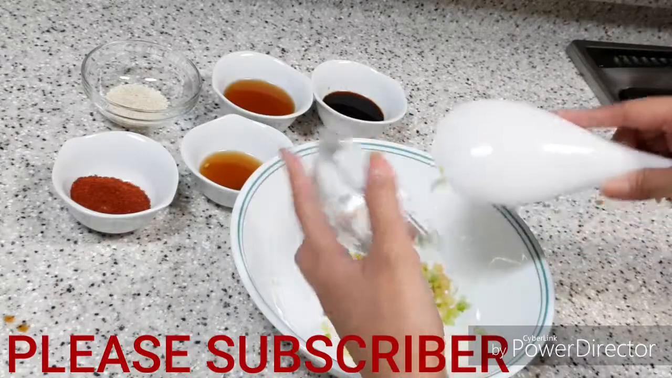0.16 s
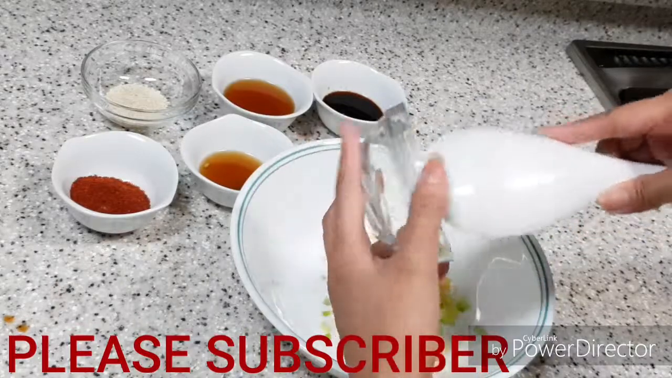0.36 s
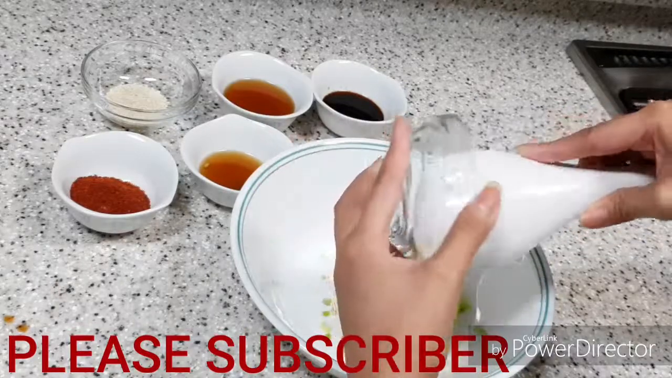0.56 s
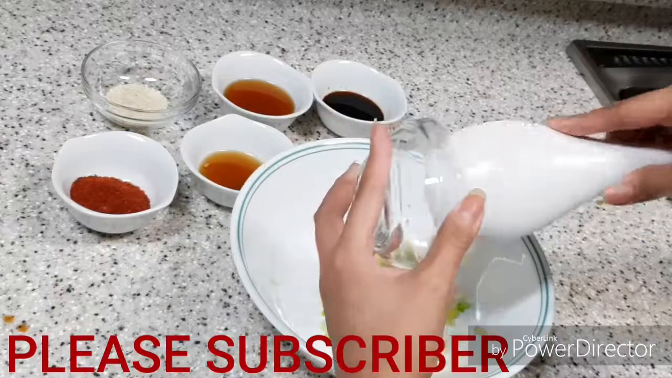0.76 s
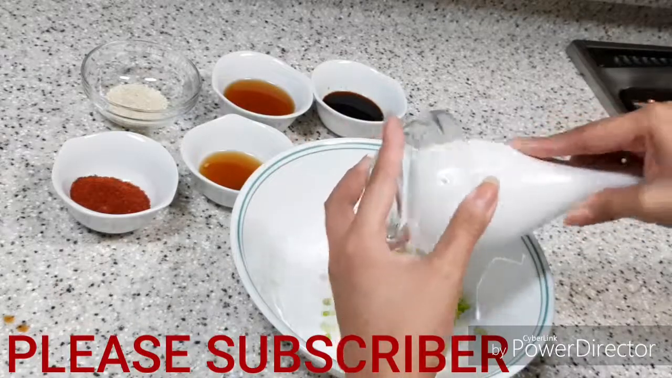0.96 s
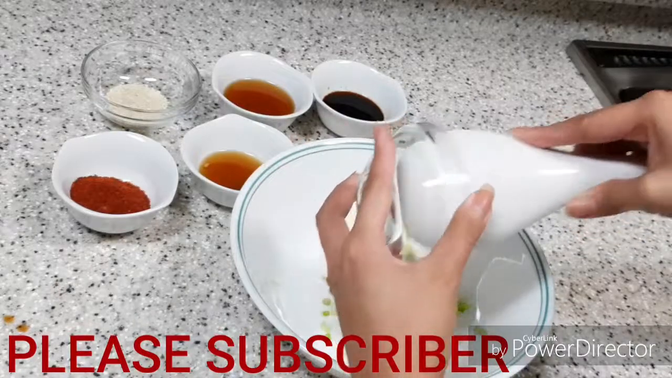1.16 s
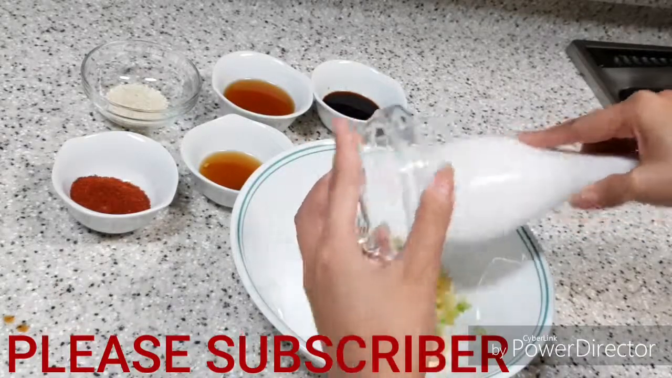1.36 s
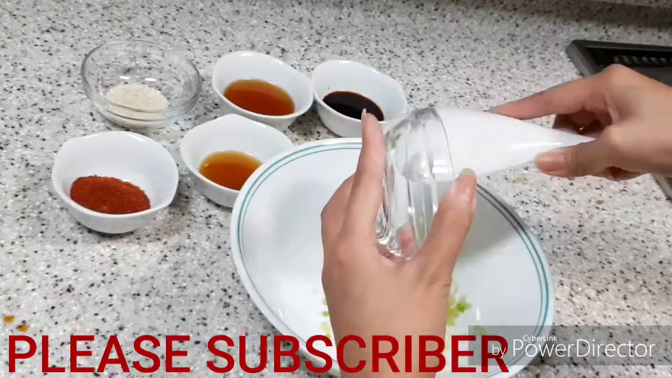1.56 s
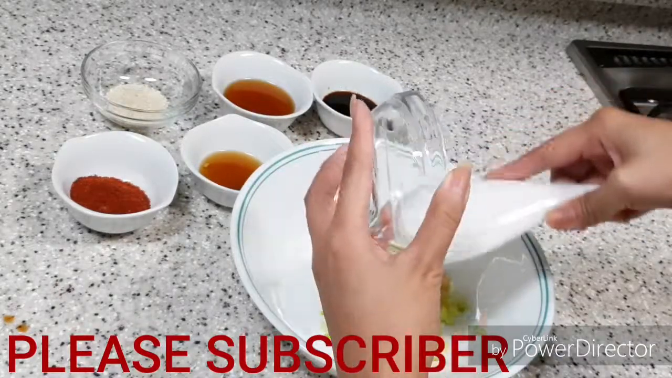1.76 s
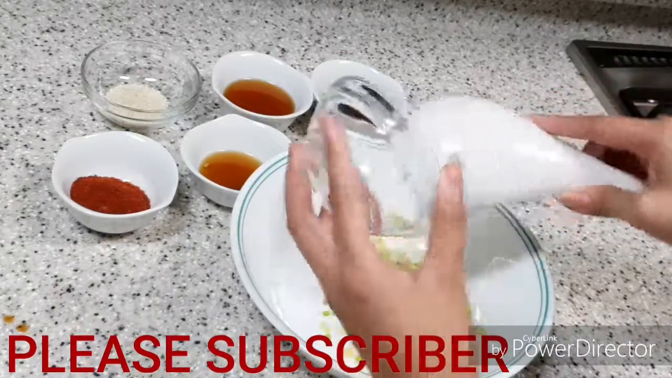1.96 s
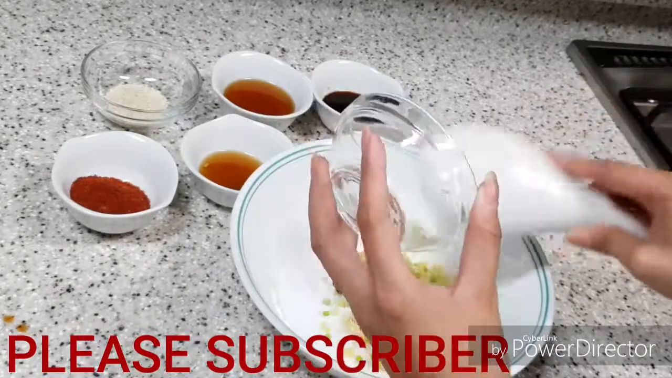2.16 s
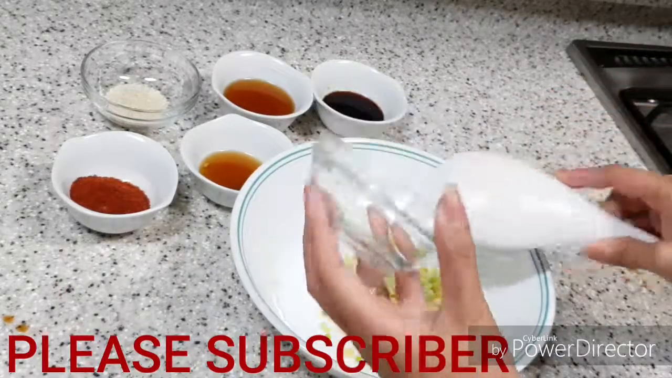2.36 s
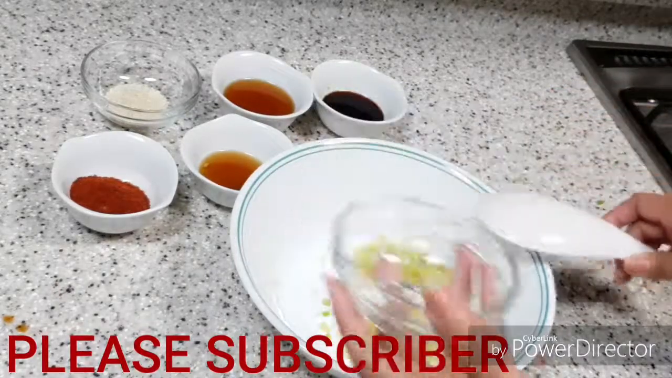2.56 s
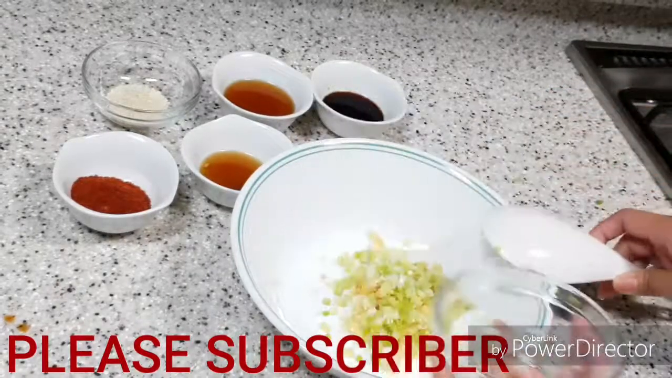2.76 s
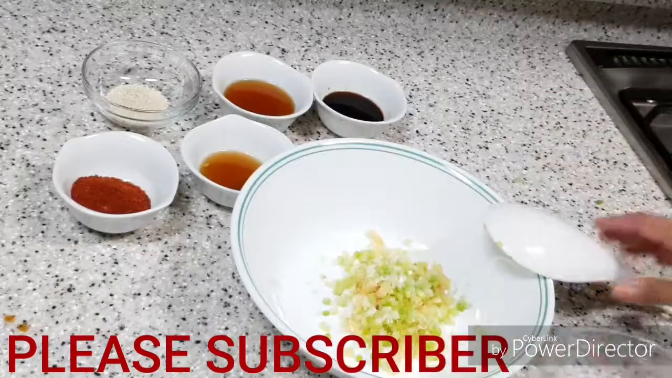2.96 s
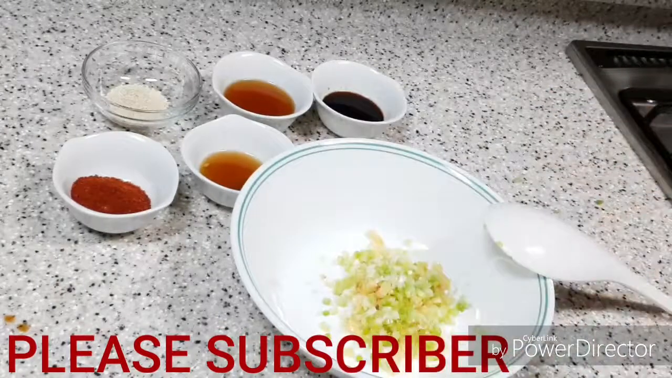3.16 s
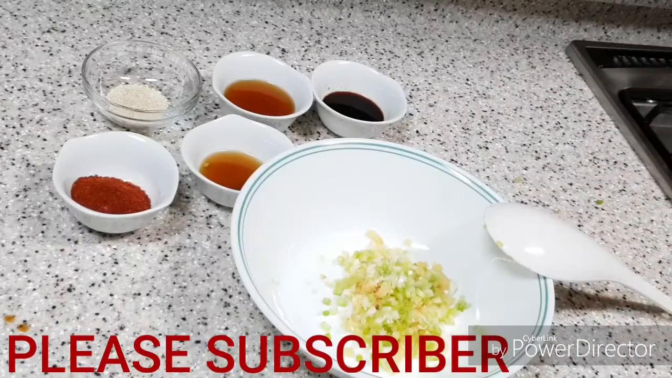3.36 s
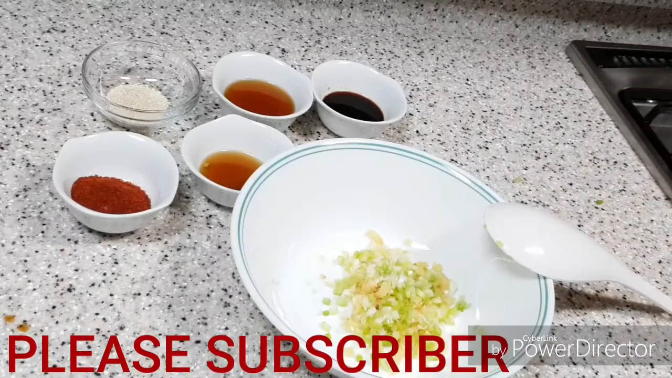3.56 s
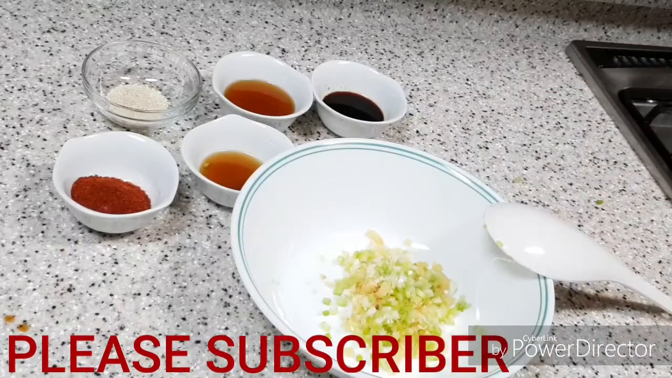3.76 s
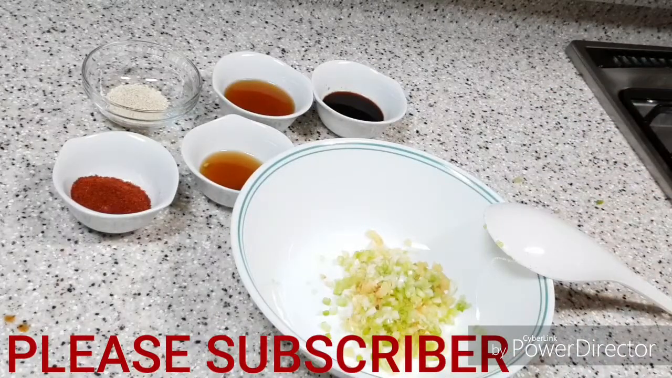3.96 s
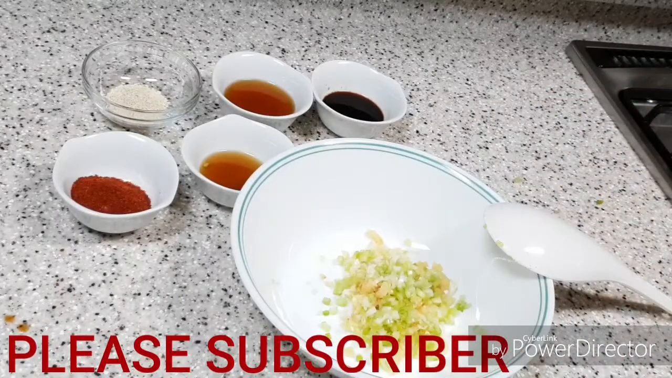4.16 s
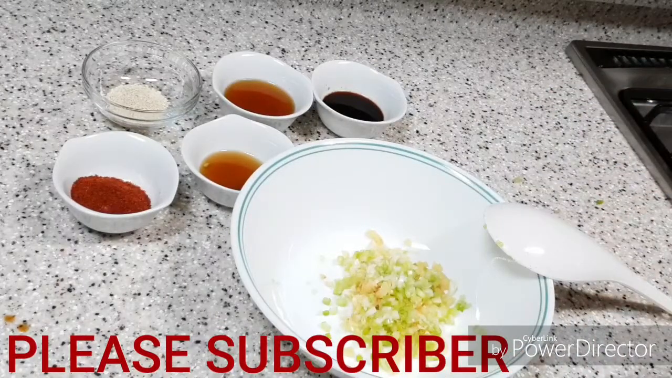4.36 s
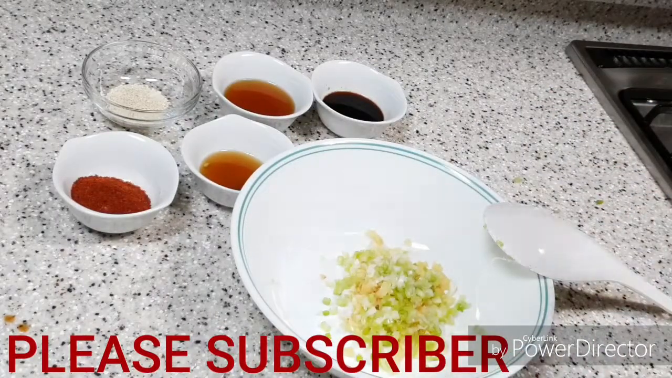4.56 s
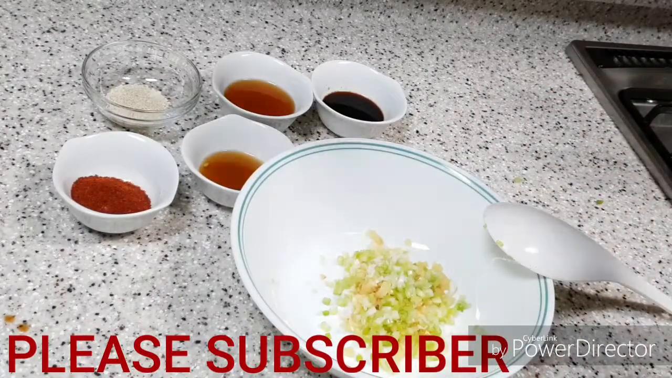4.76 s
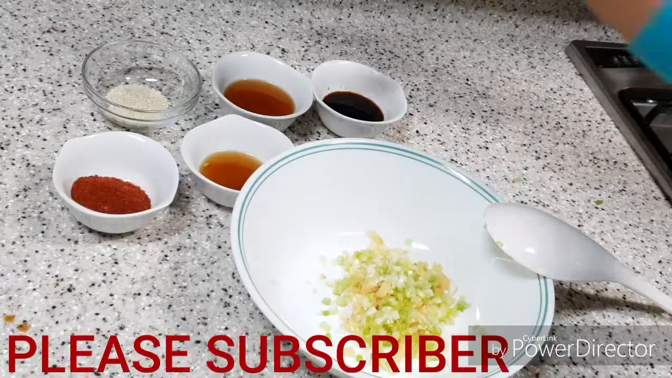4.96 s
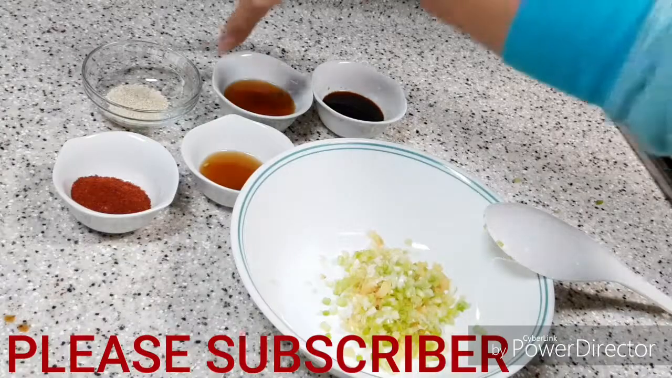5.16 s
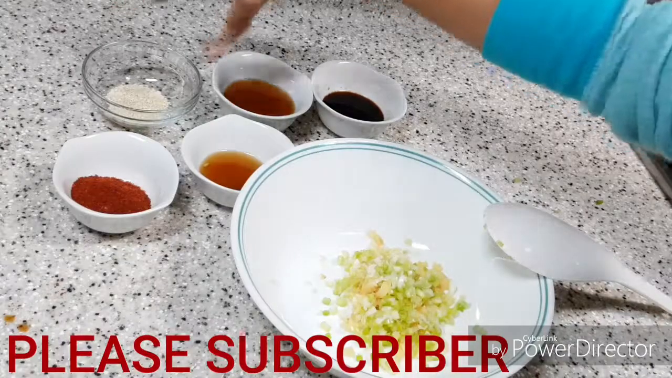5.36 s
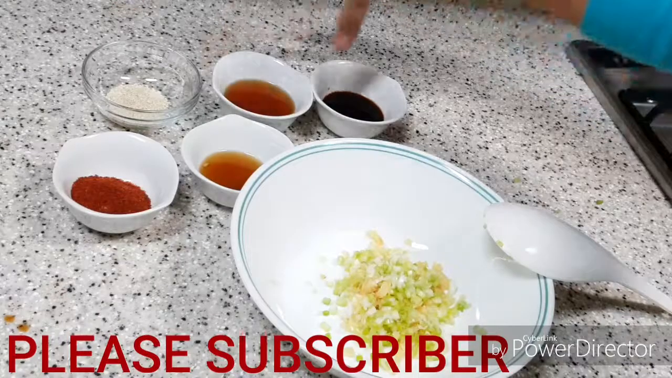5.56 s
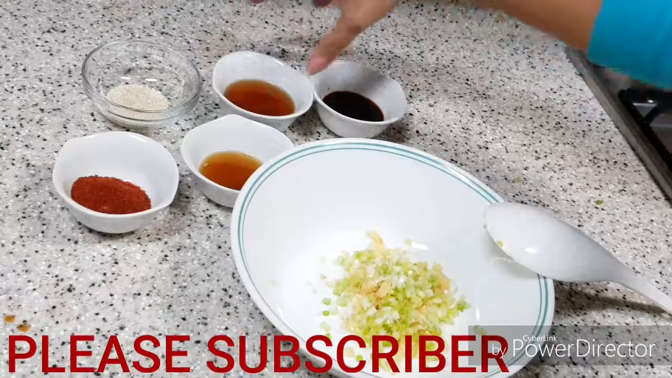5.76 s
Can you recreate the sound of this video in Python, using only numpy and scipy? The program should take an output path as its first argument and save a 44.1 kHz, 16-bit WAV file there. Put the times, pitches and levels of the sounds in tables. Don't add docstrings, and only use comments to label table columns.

```python
import sys
import numpy as np
from scipy import signal
from scipy.fft import rfft, irfft
from scipy.io import wavfile

SR = 44100
rng = np.random.default_rng(int(sys.argv[2]) if len(sys.argv) > 2 else 0)


def pcm_store(signal):
    levels = np.round(np.clip(np.atleast_2d(signal), -1, 1) * 32767)
    wavfile.write(sys.argv[1], SR, levels.astype(np.int16).T)


def invert_db(level):
    return 10 ** (np.asarray(level, dtype=float) / 20)


N = 256220
LEAD = 4410
LONG = N + LEAD

# (time [s], crack [dB], knock [dB], knock pitch [Hz], glass ring [dB])
GLASS_TAPS = [
    (-.035, -10.5, -12, 3916, -27.5),
    (-.02, -22.5, -25, 1550, -43.5),
    (0.5478, -22, -24, 2764, -40),
    (.7052, -44, -19, 2160, -35.5),
    (1.0206, -19, -14.5, 1580, -60),
    (1.0388, -10.5, -22, 1970, -38),
    (1.3318, -14, -15, 1600, -59),
    (1.659, -10.5, -17, 1954, -41.5),
    (1.666, -20.5, -28.5, 1230, -32),
]
# (time [s], crack [dB], knock [dB], knock pitch [Hz], glass ring [dB])
GLASS_CATCHES = [
    (.7295, -37, -29, 2940, -43),
    (.7345, -29.5, -19.5, 2108, -60),
    (.7465, -28.5, -45, 2170, -35),
    (1.4052, -16, -20, 1930, -24.5),
    (1.4078, -28.5, -15, 2313, -36),
    (1.4175, -19.5, -19, 1367, -30.5),
]
# (time [s], knock [dB], knock pitch [Hz])
SOFT_TOUCHES = [
    (.11, -48.5, 500),
    (1.883, -44.5, 1282),
    (1.893, -52, 1390),
    (1.905, -47.5, 1463),
]
# (time [s], hold [s], rasp of the paddle [dB], drive into the glass [dB])
GRIP_SPELLS = [
    (.706, 0.012, -37, -34.5),
    (0.725, 0.011, -41, -38),
    (0.75, .027, -50, -36),
    (1.079, 0.026, -50, -35),
    (1.101, .018, -39.5, -40),
    (1.125, 0.029, -45, -30),
    (1.372, 0.015, -34.5, -36.5),
    (1.391, 0.012, -25.5, -39),
    (1.41, 0.017, -46.5, -37),
]
# (time [s], crack [dB], knock [dB], knock pitch [Hz], ceramic ring [dB])
RIM_BLOWS = [
    (2.7118, -11.5, -14.5, 1978, -22),
    (2.7237, -23, -31, 3920, -33.5),
    (2.8296, -21.5, -20, 2700, -34),
    (2.9534, -9.5, -15.5, 2700, -32),
    (2.9693, -12.5, -17.5, 1860, -42),
    (2.994, -16.5, -31, 2400, -39.5),
]
# (time [s], crack [dB], knock [dB], knock pitch [Hz], glass ring [dB])
STONE_BLOWS = [
    (4.128, -45, -40, 1270, -72.5),
    (4.136, -47, -44, 2200, -77.5),
    (4.15, -14, -21, 1240, -24),
    (4.156, -11, -29.5, 1520, -33.5),
    (4.162, -11.5, -18.5, 1820, -22),
    (4.169, -35.5, -30.5, 1040, -28),
]
GLASS_MODES_HZ = [1992, 2063, 2170, 2244, 2565, 3760, 4163, 4412, 4500, 4565, 4620, 6070, 7810, 7875, 7950,
                  8100, 12150]
# (level [dB], t60 [s])
GLASS_MODES_RING = [(-17, 0.023), (-6, 0.047), (-8.5, 0.029), (-13, 0.021), (-13, 0.11), (-14, 0.046),
                    (-9.5, 0.043), (-2.5, .1), (-2, 0.12), (-9.5, 0.061), (-8, 0.056), (-20, .05),
                    (-14.5, 0.064), (-5.5, 0.11), (-8.5, 0.13), (-17, 0.15), (-13, .05)]
CERAMIC_MODES_HZ = [1523, 2399, 3438, 3945, 4237, 4640, 5270, 5833, 6080, 7160, 7530, 7620, 8050, 9080,
                    10923, 12805]
# (level [dB], t60 [s])
CERAMIC_MODES_RING = [(-7.5, 0.56), (-6, .55), (-6, 0.26), (-6, .15), (-12, 0.17), (-4, 0.14), (-12, 0.02),
                      (-5.5, 0.13), (-12.5, .05), (-7.5, 0.041), (2, 0.04), (-0.5, .04), (-8.5, 0.056),
                      (-10, .05), (-6.5, 0.052), (-9, 0.078)]
# (pitch [Hz], level [dB], t60 [s])
STANDING_GLASS_MODES = [(356, -26, 0.096), (398, -15, 0.022), (589, -17, 0.18), (780, -20, 0.047),
                        (950, -4, 0.089), (1387, -4, 0.049), (1820, -3.5, 0.024), (2700, -10, 0.027),
                        (3380, -15.5, .025), (4416, -7, .03), (7290, 2.5, 0.023), (8160, 3, .035),
                        (8100, -14, .015), (13000, -6, 0.058)]
# (pitch [Hz], level [dB], t60 [s])
PADDLE_MODES = [(1230, -17.5, 0.03234), (1395, -2, 0.069), (1580, 0.5, 0.0297), (2046, 6.5, 0.021),
                (2825, 3.5, 0.048)]
# (pitch [Hz], level [dB], t60 [s])
HAND_THUD = [(540.4, -16.5, 0.044), (830, -17, 0.013)]
# (pitch [Hz], level [dB], t60 [s])
COUNTER_THUD = [(125, -10, 0.13), (185, -12.5, 0.082), (256.5, -6, .16), (322.6, -3.5, 0.058),
                (407, -1.5, 0.063), (566, -5.5, 0.14)]
# (frequency [Hz], t60 [s])
ROOM_T60 = [(100, 0.39), (400, 0.54), (1500, .33), (4000, 0.41), (8000, 0.33), (15000, 0.14)]
# (frequency [Hz], correlation [-1 to 1])
ECHO_ALIKE = [(60, .93), (130, .91), (290, .88), (640, .5), (1410, .3), (3100, -.05), (6820, -.1),
              (15000, 0)]
# (frequency [Hz], correlation [-1 to 1])
BACKGROUND_ALIKE = [(60, .93), (130, .8), (290, .72), (640, .47), (1410, -.2), (3100, -.04), (6820, 0),
                    (15000, 0)]
# (frequency [Hz], density [dB per Hz])
RUMBLE_COLOUR = [(20, -28.5), (40, -10.5), (60, 5.5), (90, -1), (170, -2), (225, -14), (330, -5), (420, -5),
                 (550, -9), (800, -13), (1200, -29.5), (1700, -49)]
# (frequency [Hz], density [dB per Hz])
HISS_COLOUR = [(900, -22), (1350, -17), (1700, 0), (1950, 0), (2100, -11), (2600, -14), (3300, -6),
               (4300, -16), (4800, -11), (6500, -12), (7300, -6), (8400, -14), (12200, -13), (15200, -18)]
# (time [s], level [dB])
HOUSE_LOAD = [
    (0, -63),
    (2.5, -63),
    (3.7, -66),
    (4.3, -63.5),
    (5.0, -65),
    (5.81, -63),
]


def held_glass():
    soft = [(s, db - 29, db, hz, db - 29) for s, db, hz in SOFT_TOUCHES]
    rows = np.array(GLASS_TAPS + GLASS_CATCHES + soft)
    top_db = np.repeat([-9.5, -29.5], [len(GLASS_TAPS), len(rows) - len(GLASS_TAPS)])
    order = np.argsort(rows[:, 0])
    contacts = blows(rows[order], top_db[order], np.c_[GLASS_MODES_HZ, GLASS_MODES_RING], HAND_THUD,
                     thud_db=-25.5, crack_s=0.0021, snap_db=0.0, knock_t60=0.04)
    return placed(contacts + scrape(), small_hz=352.0, pan_db=1.5, lag=0,
                  wet_db=1.5, build_s=0.0013, near_db=9.0)


def scrape():
    rasp, drive = pressure((np.arange(LONG) - LEAD) / SR)
    sizes = invert_db(3.33 * np.minimum(rng.exponential(1, LONG), 4)) * rng.choice([-1, 1], LONG)
    slips = sizes * (rng.random(LONG) < 4000 / SR)
    on_paddle, on_glass = rasp * slips, drive * slips
    glass = sum(invert_db(db - 24) * ring(on_glass, hz, t60)
                for hz, (db, t60) in zip(GLASS_MODES_HZ, GLASS_MODES_RING))
    paddle = sum(invert_db(db - 21) * ring(on_paddle, hz, t60) for hz, db, t60 in PADDLE_MODES)
    hand = sum(invert_db(db - 26) * ring(on_paddle, hz, t60) for hz, db, t60 in HAND_THUD)
    grain = invert_db(-8) * band(on_paddle, 500, 4200) + invert_db(-18) * band(on_glass, 5500, 14000)
    return np.array([paddle + hand + grain, glass])


def pressure(t):
    swell_db_per_s, release_db_per_s = 4000, 2499
    gains = 0
    for s, hold, rasp_db, drive_db in GRIP_SPELLS:
        swell_db = swell_db_per_s * np.clip(t - s, -.1, 0)
        release_db = release_db_per_s * np.clip(t - s - hold, 0, .1)
        gains = gains + invert_db(swell_db - release_db + np.array([[rasp_db], [drive_db]]))
    return gains


def ceramic_rim():
    contacts = blows(RIM_BLOWS, -5, np.c_[CERAMIC_MODES_HZ, CERAMIC_MODES_RING], COUNTER_THUD,
                     thud_db=-20.0, crack_s=0.00402, snap_db=-1, knock_t60=.02)
    return placed(contacts, small_hz=126, pan_db=-0.7, lag=-6, wet_db=4.5, build_s=0.00077, near_db=7.0)


def glass_set_down():
    contacts = blows(STONE_BLOWS, -9.5, STANDING_GLASS_MODES, COUNTER_THUD,
                     thud_db=-34.0, crack_s=0.0033, snap_db=-2, knock_t60=.03)
    return placed(contacts, small_hz=270, pan_db=5.0, lag=10, wet_db=6, build_s=0.00087, near_db=10.0)


def blows(rows, top_db, body, thud, thud_db, crack_s, snap_db, knock_t60):
    s, crack_db, knock_db, knock_hz, ring_db = np.transpose(rows)
    treble_db = crack_db + top_db
    at, t = np.round(s * SR).astype(int) + LEAD, np.arange(4410) / SR
    fade = np.exp(-t / crack_s) + invert_db(snap_db) * np.exp(-t / 0.00073)
    grit = rng.standard_normal((len(at), len(t))) * fade
    middle, top, knock = np.zeros((3, LONG))
    for k, i in enumerate(at):
        span = slice(i, i + len(t))
        middle[span] += invert_db(crack_db[k]) * grit[k]
        top[span] += invert_db(treble_db[k]) * grit[k]
        w = 2 * np.pi * knock_hz[k]
        pair = np.sin(w * .97 * t) + np.sin(w * 1.03 * t)
        knock[span] += invert_db(knock_db[k] - 8.5 - 60 * t / knock_t60) * pair
    crack = band(middle, 1300, 6950) + band(top, 5000, 12000)
    low = strike(at, knock_db + thud_db, thud, spread_db=2)
    return np.array([crack + knock + low, strike(at, ring_db + 3, body, spread_db=2)])


def strike(at, db, modes, spread_db):
    out, luck = np.zeros(LONG), rng.standard_normal((len(at), len(modes)))
    for k, (hz, mode_db, t60) in enumerate(modes):
        force = np.zeros(LONG)
        force[at] = invert_db(db + mode_db + spread_db * luck[:, k])
        out += ring(force, hz, t60)
    return out


def ring(force, hz, t60):
    r, w = invert_db(-60 / (t60 * SR)), 2 * np.pi * hz / SR
    return signal.lfilter([0, np.sin(w)], [1, -2 * r * np.cos(w), r * r], force + 1e-18)


def band(x, low_hz, high_hz):
    return signal.sosfilt(signal.butter(2, [low_hz, high_hz], "band", fs=SR, output="sos"), x + 1e-18)


def placed(layers, small_hz, pan_db, lag, wet_db, build_s, near_db):
    clatter, dish = signal.sosfilt(signal.butter(4, small_hz, "high", fs=SR, output="sos"), layers)
    x = clatter + dish
    direct = np.array([np.roll(x, lag) * invert_db(pan_db / 2), x * invert_db(-pan_db / 2)])
    into_room = clatter + invert_db(-4.5) * dish
    return (direct + invert_db(wet_db) * kitchen(into_room, build_s, near_db))[:, LEAD:]


def kitchen(x, build_s, near_db):
    size = 22050
    t = np.arange(size) / SR
    hz, noise = stereo_noise(size, ECHO_ALIKE)
    echoes = 0
    for centre in 90 * 2 ** np.arange(8.0):
        share = np.cos(np.pi / 2 * np.clip(np.log2(hz / centre), -1, 1)) ** 2
        echoes = echoes + irfft(noise * share, size) * invert_db(-60 * t / at_hz(ROOM_T60, centre))
    echoes = echoes * (1 - np.exp(-t / build_s)) * (1 + invert_db(near_db) * np.exp(-t / 0.012))
    echoes = echoes / np.sqrt(np.sum(echoes ** 2, axis=1, keepdims=True))
    return signal.fftconvolve(x[None], echoes, axes=1)[:, :LONG]


def stereo_noise(size, likeness):
    hz = np.maximum(np.fft.rfftfreq(size, 1 / SR), 1)
    mid, side = rfft(rng.standard_normal((2, size)))
    alike = np.clip(at_hz(likeness, hz), -1, 1)
    return hz, (np.sqrt(1 + alike) * mid + np.sqrt(1 - alike) * side * [[1], [-1]]) / np.sqrt(2)


def at_hz(points, hz):
    table_hz, values = np.transpose(points)
    return np.interp(np.log(hz), np.log(table_hz), values)


def background():
    t = np.arange(N) / SR
    load_db = np.interp(t, *np.transpose(HOUSE_LOAD))
    since = t - 2.863
    mains = invert_db(-65.8) * np.cos(2 * np.pi * 60.04 * since)
    motor = invert_db(-68.8) * np.cos(2 * np.pi * 58.26 * since)
    low = mains + motor + steady(RUMBLE_COLOUR, load_db - .5)
    hiss = steady(HISS_COLOUR, -62 + 0.68 * (load_db - load_db.mean()))
    return low * invert_db([[1.2], [-1.2]]) + hiss


def steady(spectrum, level_db):
    hz, noise = stereo_noise(N, BACKGROUND_ALIKE)
    x = irfft(noise * invert_db(at_hz(spectrum, hz)) * (hz > 18), N)
    return x / np.sqrt(np.mean(x ** 2)) * invert_db(level_db)


def scene():
    return held_glass() + ceramic_rim() + glass_set_down() + background()


def band_limit(x):
    return signal.sosfilt(signal.butter(12, 16470, fs=SR, output="sos"), x)


def record(dry):
    rounded = 1.232 * np.tanh(dry / 1.366)
    top_cut = signal.ellip(4, .5, 30, 15000, fs=SR, output="sos")
    return band_limit(signal.sosfilt(top_cut, rounded))


dry = scene()
out = record(dry)
pcm_store(out)
```